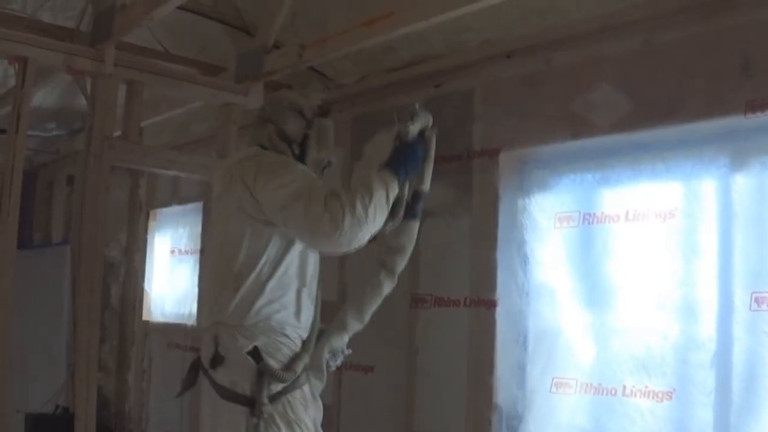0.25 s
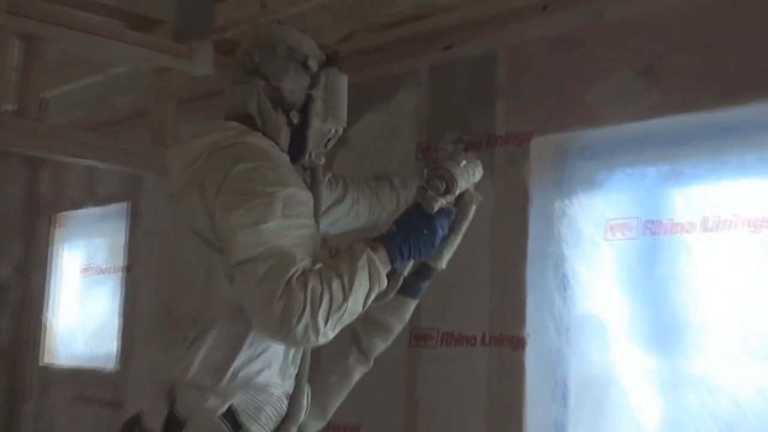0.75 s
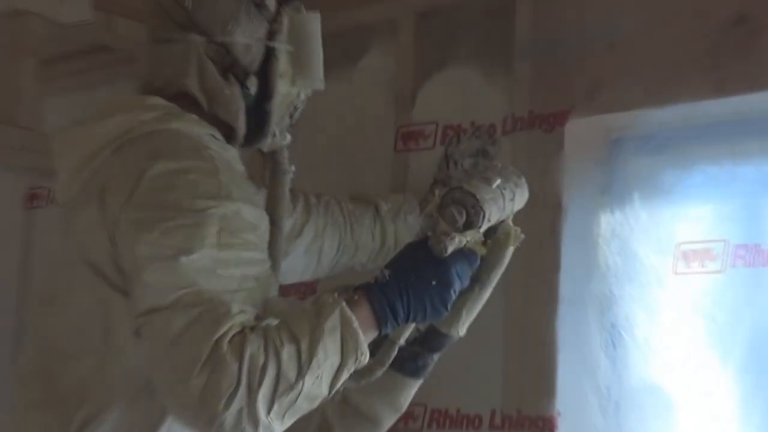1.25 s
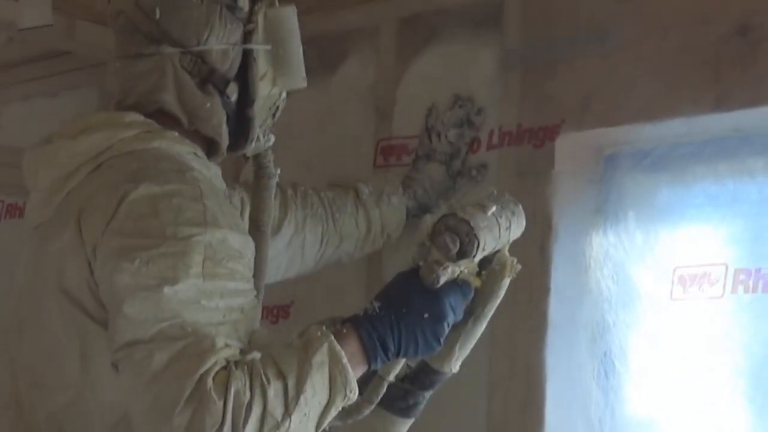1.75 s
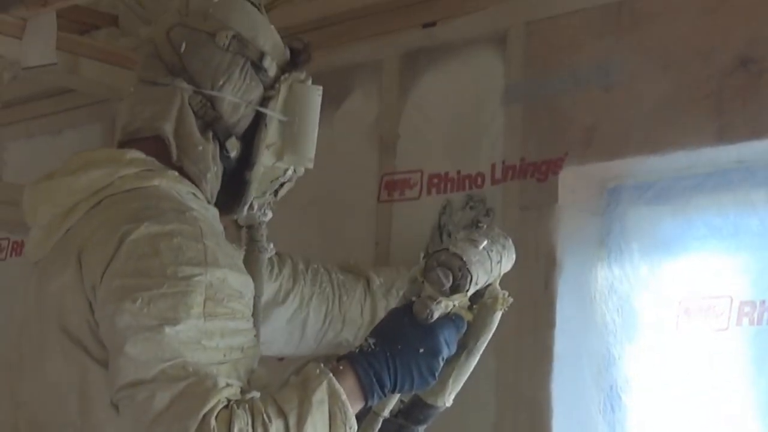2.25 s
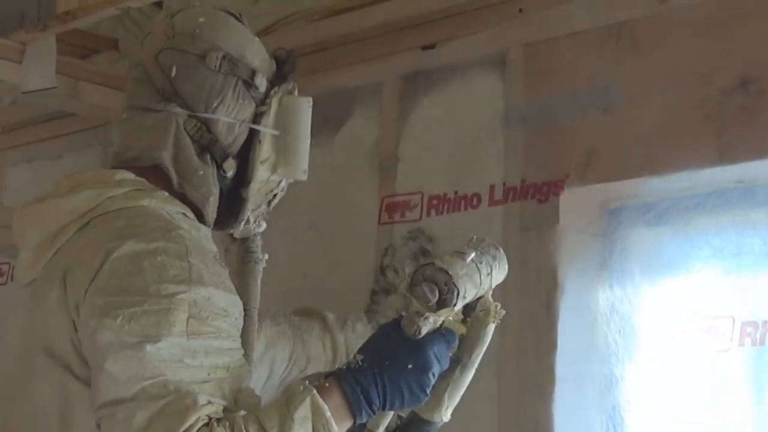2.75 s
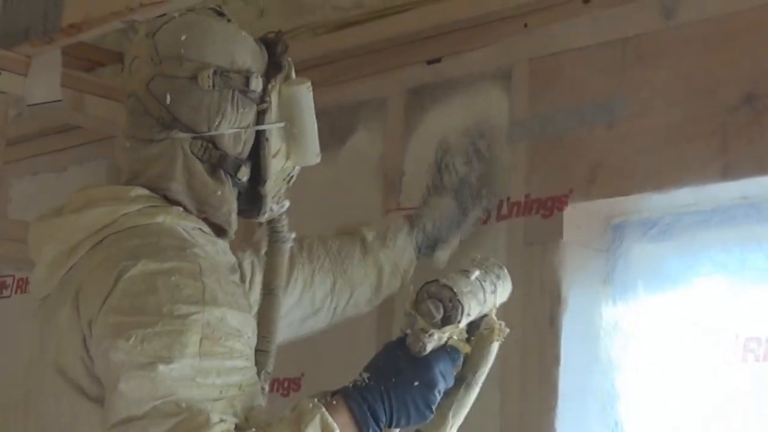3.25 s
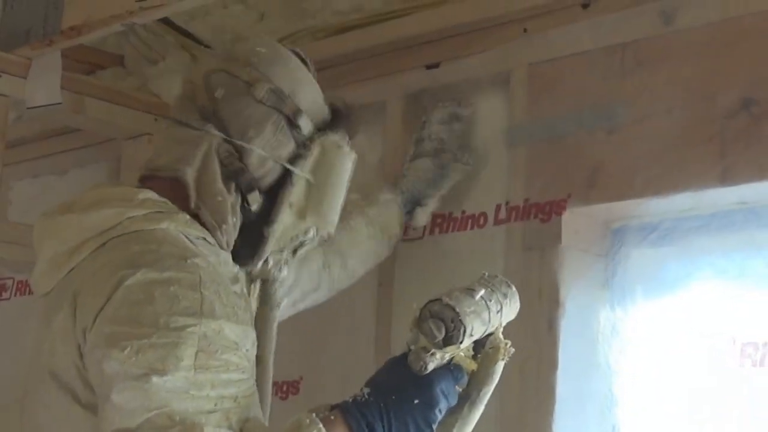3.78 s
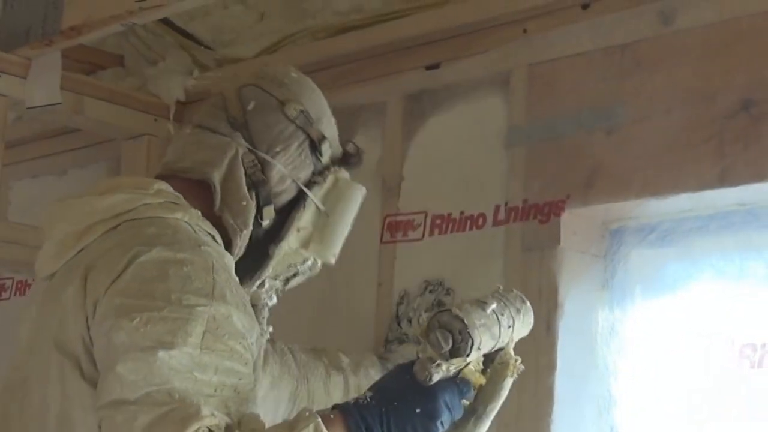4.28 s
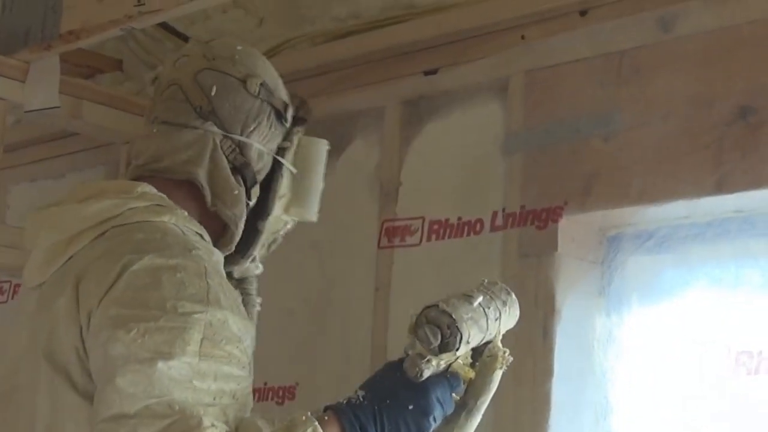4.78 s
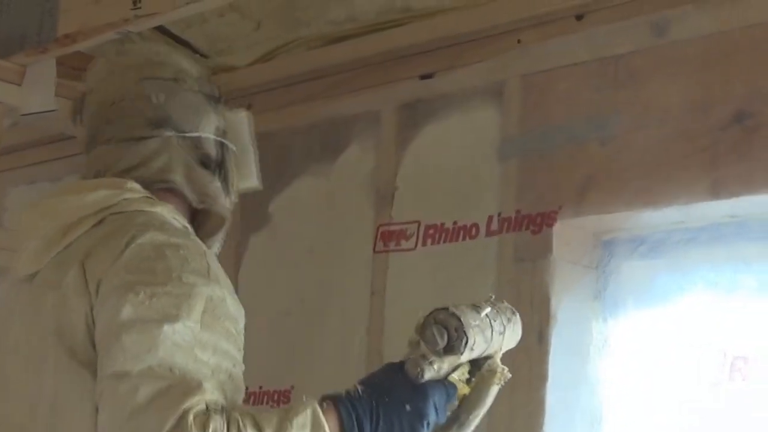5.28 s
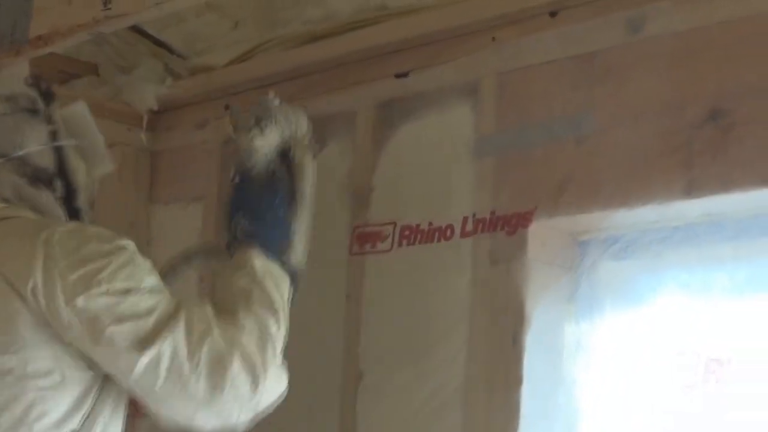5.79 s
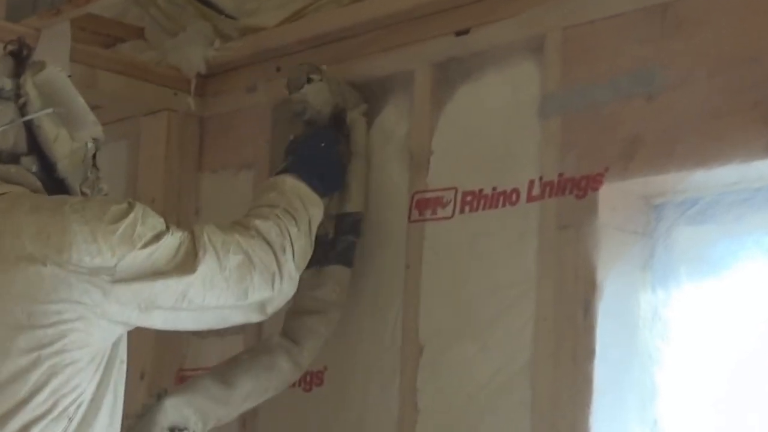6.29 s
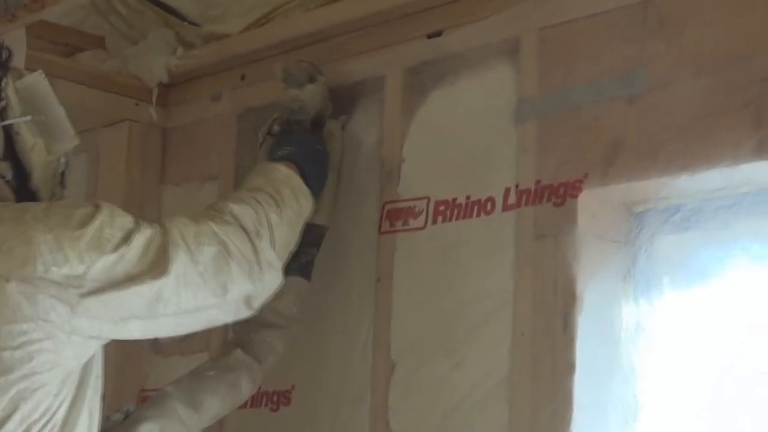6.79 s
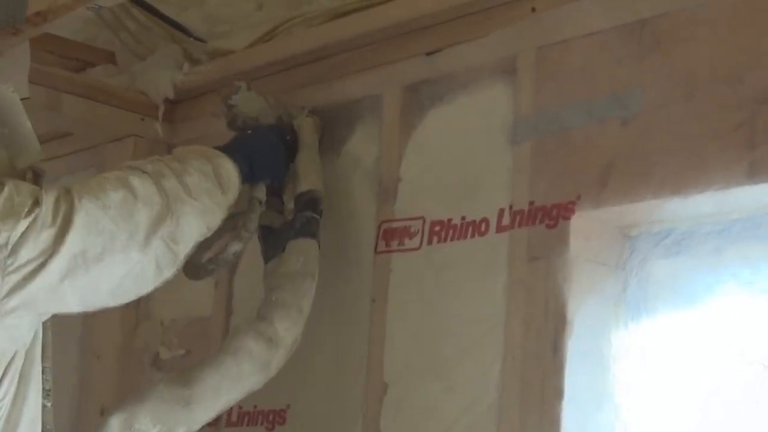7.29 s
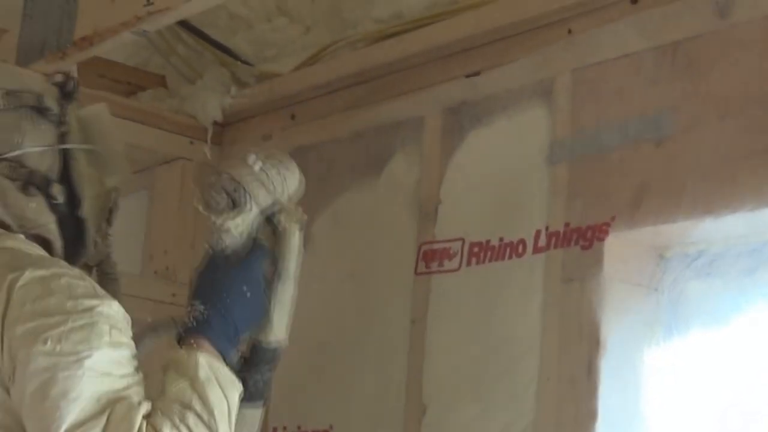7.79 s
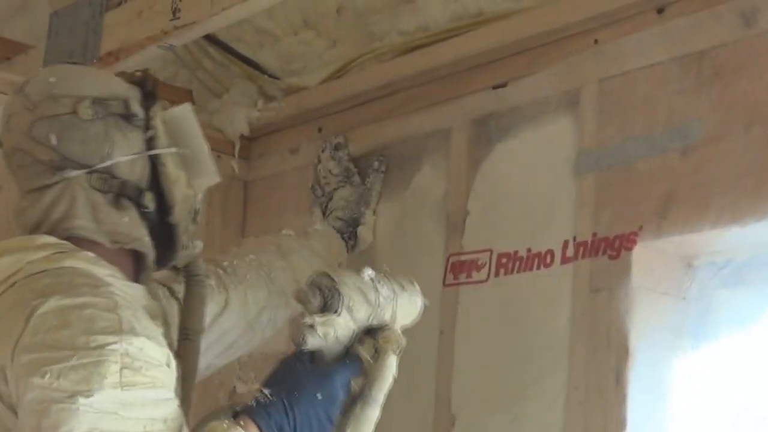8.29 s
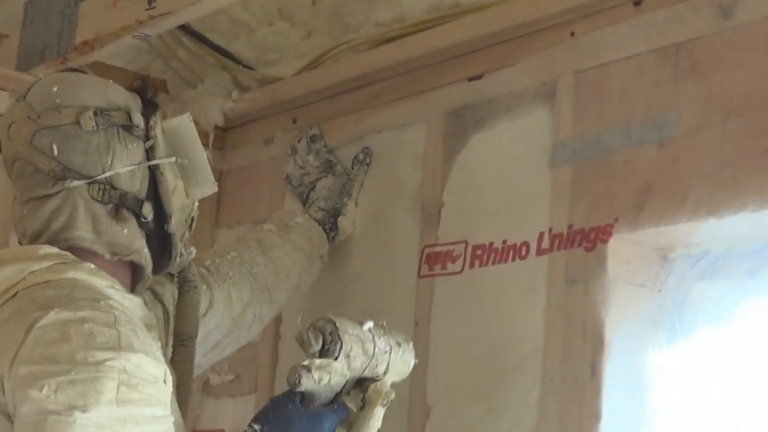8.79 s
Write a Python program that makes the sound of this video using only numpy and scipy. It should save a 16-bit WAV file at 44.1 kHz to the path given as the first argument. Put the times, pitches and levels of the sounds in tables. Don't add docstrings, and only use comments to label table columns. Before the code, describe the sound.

A foam gun bleeds air in a bright, steady hiss in a bare timber room, close to a small stereo microphone. A protective suit and hose rustle and knock dully on studs over a faint compressor hum. Past six seconds a hard blow rings the wood; the hiss drops for half a second, then bursts back with metallic ticks and more knocks.

```python
import sys
import numpy as np
from scipy import signal
from scipy.io import wavfile
from scipy.ndimage import uniform_filter1d

SR = 44100
rng = np.random.default_rng(int(sys.argv[2]) if len(sys.argv) > 2 else 0)


def generate_wav(sig):
    pcm = np.round(np.clip(np.atleast_2d(sig).T, -1, 1) * 32767).astype(np.int16)
    wavfile.write(sys.argv[1], SR, pcm)


def how_loud(loudness_db):
    steps = np.asarray(loudness_db, float) / 20
    return 10 ** steps


N = 398663

AIR_OFF_S, AIR_ON_S = 6.888, 7.375
CUT_FALL_S, CUT_RISE_S = 0.017, 0.008


def evened(x):
    return x / np.sqrt(np.mean(x ** 2) + 1e-20)


def smooth(x, size, axis=-1):
    return uniform_filter1d(uniform_filter1d(x, size, axis=axis), size, axis=axis)


def ramp(t, start, length):
    return np.clip((t - start) / max(length, 1e-3), 0, 1)


def bump(x, centre, width):
    return np.exp(-0.5 * ((x - centre) / width) ** 2)


def read(points, hz):
    f, value = np.transpose(points)
    return np.interp(np.log(hz + 1), np.log(f + 1), value)


def drift(shape, frames, bins):
    patches = smooth(rng.standard_normal(shape), frames, axis=0)
    return evened(uniform_filter1d(patches, size=bins, axis=1))


def grid(size):
    hop = size // 4
    return np.arange(N // hop + 5)[:, None] * hop / SR, np.fft.rfftfreq(size, 1 / SR)


def pair(gain, hz, size, wide_db=0):
    # (f/Hz, correlation)
    likeness = [(40, 1), (150, 0.94), (400, 0.95), (1000, 0.91), (2500, 0.77), (6000, 0.86), (10000, 0.96),
                (15000, 0.93)]
    a, b, c, d = rng.standard_normal((4,) + gain.shape)
    same = np.clip(read(likeness, hz), -1, 1)
    share = np.clip(np.sqrt((1 - same) / 2) * how_loud(wide_db), 0, 1)
    mid = np.sqrt(1 - share ** 2) * (a + 1j * b)
    side = share * (c + 1j * d)
    z = np.array([mid + side, mid - side]) * gain
    return signal.istft(z.transpose(0, 2, 1), nperseg=size, noverlap=size * 3 // 4)[1][:, :N]


def bay(hz):
    # (f/Hz, width/Hz, level/dB)
    cavity = [(904, 38, -4.5), (1238, 35, 5), (1671, 22, 6), (2380, 17, -6.5), (2580, 17, -1),
              (3030, 220, 0.5), (6070, 320, -1.5), (6070, 33, 0.5), (11150, 120, 0.5)]
    return sum(db * bump(hz, f, width) for f, width, db in cavity)


def hum():
    # (f/Hz, level/dB rms)
    orders = [(61, -92), (122.2, -62.5), (183.3, -67.5), (244, -75.5), (305, -81), (408, -71.5)]
    t = np.arange(N) / SR
    waver = evened(smooth(rng.standard_normal((len(orders), N)), 4000))
    out = np.zeros(N)
    for (hz, db), w in zip(orders, waver):
        out += how_loud(db + 3.8 + 1.2 * w) * np.sin(2 * np.pi * (hz * t + 0.06 * w))
    return out


def rustle():
    # (f/Hz, level/dB per Hz)
    colour = [(20, -4), (45, -16), (75, -8), (118, 2), (300, -1.5), (700, 1), (950, 1.5), (1500, -9.5),
              (2500, -6), (5000, -15)]
    # (t/s, level/dB, camera handling rumble re level/dB)
    wash = [
        (0, -59.5, -9),
        (1.2, -59.5, -8.5),
        (4.4, -59.5, -9),
        (4.8, -62, -16),
        (5.5, -61.5, -15),
        (6.4, -60, -14),
        (6.7, -61, -7),
        (8.1, -59.5, -12),
        (9.04, -63.5, -9),
    ]
    # (start t/s, length/s, level over the wash/dB, upper part/dB)
    moves = [(-.1, 0.099, 11, 10), (.1, 0.24, 4.5, 3), (.36, 0.24, 7.5, 5), (1.304, .2, 0, 8),
             (2.15, .45, 2, -2), (4.005, 0.33, 1, 9.5), (4.538, 0.084, 1, 11), (4.87, .14, 4.5, 9),
             (5.753, 0.27, 6.5, 4), (6.05, 0.39, 10, 4), (6.388, 0.1, 18, -5), (6.505, 0.4, 7, 5),
             (6.87, .5, 11.5, 4.5), (7.422, .22, 10, 6), (7.666, 0.14, 6, 6), (8.48, 0.17, 1.5, 11.5)]
    rise_s, fall_s, rumble_share = 0.023, 0.087, 0.49
    t, hz = grid(size=1024)
    wash_s, wash_levels, rumble_levels = np.transpose(wash)
    wash_db = np.interp(t, wash_s, wash_levels)
    rumble_db = np.interp(t, wash_s, rumble_levels)

    shapes = [ramp(t, s, rise_s) - ramp(t, s + length, fall_s) for s, length, _, _ in moves]
    move_db = np.max([move[2] * shape for move, shape in zip(moves, shapes)], axis=0)
    upper_db = 2.5 + np.max([move[3] * shape for move, shape in zip(moves, shapes)], axis=0)
    boom_db = rumble_db - (1 - rumble_share) * move_db + 1.5 * drift((len(t), 1), frames=24, bins=1)

    field_db = read(colour, hz) + bay(hz) + wash_db + move_db
    field_db += (upper_db - 4.5) * np.clip((hz - 700) / 500, 0, 1)
    field_db += (boom_db + 14) * np.clip((170 - hz) / 60, 0, 1)
    field_db += 0.75 * drift((len(t), 1), frames=5, bins=1)
    field_db += 0.39 * drift(field_db.shape, frames=6, bins=8)
    return how_loud(-9) * pair(how_loud(field_db), hz, size=1024)


def knocks():
    # (t/s, peak level/dB, f/Hz, upper part re peak/dB, t60/s)
    blows = [(.005, -43, 480, 14, 0.069), (.352, -40.5, 160, -14, 0.13), (.362, -32, 385, -5, 0.085),
             (0.439, -46, 170, -23, 0.34), (1.9, -43, 243, -16, 0.2), (2.191, -43.5, 200, -13, 0.26),
             (2.798, -41, 240, -8, .2), (3.77, -42, 121, 4, 0.093), (3.895, -44, 107, -22, 0.22),
             (3.945, -38, 95, -20, 0.12), (4.045, -36, 160, -19, 0.13), (4.181, -38, 141, -10, 0.16),
             (4.475, -42, 135, -16, 0.32), (4.53, -39, 153, -10, 0.11), (4.59, -35.5, 153, -3, 0.24),
             (4.91, -46, 397, -7, 0.15), (6.18, -35, 187, 1, 0.13), (6.397, -14, 368, -10, 0.33),
             (7.411, -43, 222, -8, 0.18), (7.517, -25.5, 283, -5, 0.099), (7.522, -30, 568, -2, 0.14),
             (7.543, -24, 255, -6, .09), (7.577, -28, 153, -3, 0.17)]
    # (f/Hz, level/dB, t60/s)
    modes = [(140, -7, .6), (185, -9, .5), (250, -7, .5), (296, -4, .45), (334, 3, .45), (409, -6, .35),
             (463, -3, .35), (520, -6, .3), (600, -8, .25), (690, -13, .2), (1220, -9, .07),
             (1410, -13, .1), (1710, -15, .1)]
    out, t = np.zeros((2, N + SR)), np.arange(SR // 3) / SR
    stud = np.zeros(len(t))
    for k, (hz, db, t60) in enumerate(modes):
        sign = (-1) ** ((k + 1) // 2)
        stud += sign * how_loud(db - 60 * t / t60) * np.sin(2 * np.pi * hz * t)
    stud /= abs(stud).max()

    for s, db, hz, upper_db, t60 in blows:
        noise = rng.standard_normal((3, len(t)))
        ring = stud if db > -23 else 0.6 * np.sin(2 * np.pi * hz * t)
        low = signal.lfilter(*signal.butter(2, [0.65 * hz, 1.6 * hz], "band", fs=SR), noise)
        high = signal.lfilter(*signal.butter(3, [500, 1800], "band", fs=SR), noise)
        scatter = evened(low) + how_loud(upper_db + 4) * evened(high)
        scatter = scatter[0] + 0.39 * scatter[1:]
        scatter = scatter * np.minimum(t / 0.0015, 1)
        start = round(s * SR)
        out[:, start:start + len(t)] += (0.8 * ring + 0.26 * scatter) * how_loud(db - 60 * t / t60)
    return out[:, :N]


def ticks():
    # (t/s, peak level/dB, f/Hz, t60/s)
    rings = [
        (6.812, -34, 3650, .06),
        (7.374, -32, 1850, .08),
        (7.376, -30.5, 5200, .11),
        (7.378, -33, 3000, .05),
        (7.378, -29, 10300, .07),
        (7.497, -41, 1980, .2),
        (7.516, -40, 1970, .15),
    ]
    out, t = np.zeros(N + SR), np.arange(SR // 5) / SR
    for s, db, hz, t60 in rings:
        ring = np.sin(2 * np.pi * hz * t) + 0.6 * np.sin(2 * np.pi * 1.03 * hz * t + 1)
        start = round(s * SR)
        out[start:start + len(t)] += how_loud(db - 60 * t / t60) * ring * np.minimum(t / 0.00057, 1)
    return out[:N]


def spatter():
    size = how_loud(1.7 * np.minimum(rng.exponential(1, N), 4))
    clicks = size * (rng.random(N) < 90 / SR) * rng.choice([-1, 1], N)
    grains = signal.lfilter(*signal.butter(1, [900, 6000], "band", fs=SR), clicks)
    return how_loud(-61.5) * evened(grains)


def whistles():
    # (middle t/s, length/s, f/Hz, level/dB rms)
    edge_tones = [
        (.96, .08, 3030, -50),
        (1.17, .05, 3000, -53),
    ]
    t = np.arange(N) / SR
    pitch_wobble, level_wobble = evened(smooth(rng.standard_normal((2, N)), 500))
    tones = np.zeros(N)
    for s, length, hz, db in edge_tones:
        tones += how_loud(db + 6) * bump(t, s, length) * np.sin(2 * np.pi * (hz * t + 0.13 * pitch_wobble))
    return tones * how_loud(2.9 * level_wobble)


def air_cut(t):
    return ramp(t, AIR_OFF_S, CUT_FALL_S) - ramp(t, AIR_ON_S, CUT_RISE_S)


def valve_db(t):
    leak_db = -5 + 5.5 * (t - AIR_OFF_S)
    burst = ramp(t, AIR_ON_S, CUT_RISE_S) * np.exp(-abs(t - AIR_ON_S) / 0.03)
    return -25.8 + air_cut(t) * leak_db + 1.5 * burst


def jet():
    # (f/Hz, level/dB per Hz)
    colour = [(400, -34.5), (800, -26), (1500, -20.5), (2000, -14.5), (3000, -12), (4200, -9), (5300, -7),
              (6800, -2.5), (7600, 0.5), (8600, 0), (10000, -1), (11500, -3), (13500, -6.5), (15800, -13.5)]
    # (t/s, turn toward the camera 0-1, sharpness/dB, core peak f/Hz, side lobe f/Hz)
    aim = [(0, 0.95, 0, 8650, 5050), (.45, .5, -1, 8750, 4940), (.95, 0.45, 0.8, 8900, 6500),
           (1.35, 0, -0.16, 8560, 5100), (2, 0.2, 0.2, 8550, 5300), (2.45, 0.2, 0.1, 8900, 5940),
           (3.0, 0.2, .3, 8650, 5440), (3.85, .1, .3, 9100, 4900), (4.3, 0.06, -1, 8440, 5140),
           (5.3, 0.33, -1, 8500, 5240), (5.7, 0.4, 0, 8800, 5000), (6.2, 0.7, 1.5, 9300, 5230),
           (6.5, 1, -2, 8750, 5000), (7.6, 1, -.5, 9200, 5200), (8.1, 0.6, -0.7, 8800, 5170),
           (8.38, 0.1, -.3, 8800, 6300), (8.65, 0.34, -0.7, 8700, 5470), (9.04, 0.2, 3, 8900, 5700)]
    # (t/s, f/Hz, length/s, level/dB)
    glints = [(1.0, 3050, .16, 6), (1.31, 9040, .2, 3), (1.77, 4390, .23, -3), (1.77, 5150, .3, 3.5),
              (1.85, 7490, .3, -4), (2.4, 11110, .14, 4), (2.41, 5080, .15, -4), (2.72, 7670, .4, -3),
              (3.57, 8180, .15, 3.5), (3.84, 4800, .23, 4), (4.46, 3530, .18, 4), (4.65, 3010, .7, -4),
              (5.38, 7700, .06, 4), (5.48, 4950, .035, 8), (5.58, 7350, .03, 6), (5.63, 4800, .02, 6),
              (5.7, 7550, .035, 6), (6.22, 2850, .06, 5.5), (6.37, 2240, .26, -4), (6.46, 5430, .23, -3),
              (6.65, 2850, .17, 5.5), (6.65, 3200, .15, 3), (6.65, 12490, .13, 4), (6.79, 10250, .14, 4),
              (8.6, 11370, .13, 5), (8.66, 3360, .17, -4), (8.66, 5600, .12, 2), (8.68, 4050, .15, 3)]
    t, hz = grid(size=512)
    aim_s, *aim_columns = np.transpose(aim)
    turn, sharp_db, core_hz, lobe_hz = (np.interp(t, aim_s, column) for column in aim_columns)
    cut = air_cut(t)
    top_db = -2.5 + 3.6 * turn - 1.3 * cut + 0.79 * sharp_db
    body_db = -3.5 + 0.44 * turn - 2.3 * cut - 0.76 * sharp_db
    base_db = -4.5 + 2.9 * turn - 0.57 * sharp_db

    field_db = read(colour, hz) + bay(hz)
    field_db = field_db + (4.9 - 2.2 * cut) * bump(hz, core_hz, 610 + 220 * turn)
    lobe_db = 1.5 * bump(hz, lobe_hz, 280)
    lobe_db -= 2 * bump(hz, 0.84 * lobe_hz, 510)
    field_db += (1 - turn) * lobe_db
    below_core = np.clip((7200 - hz) / 1400, 0, 1)
    below_body = np.clip((4200 - hz) / 800, 0, 1)
    field_db += top_db * np.clip((hz - 10000) / 2500, 0, 1.3)
    field_db += (7 + body_db) * (below_core - below_body) + (8 + base_db) * below_body
    for s, f, length, db in glints:
        field_db += db * bump(hz, f, 0.024 * f) * bump(t, s, length)
    field_db += 0.85 * drift(field_db.shape, frames=70, bins=4)
    field_db += 0.8 * drift(field_db.shape, frames=7, bins=14)
    field_db += (0.3 + 0.55 * below_body) * drift((len(t), 1), frames=5, bins=1)

    wide_db = (2.5 - 5 * turn) * np.clip((hz - 9500) / 2000, 0, 1)
    hiss = evened(pair(how_loud(field_db), hz, size=512, wide_db=wide_db))
    time = np.arange(N) / SR
    pan_db = -1.9 + 2 * np.interp(time, t[:, 0], turn[:, 0])
    return how_loud(valve_db(time) + pan_db * [[0.5], [-0.5]] - 1.59) * hiss


def room(x, t60=0.14, wet_db=-9.0, turns_per_s=0.606):
    at = np.arange(130, SR // 3, 20)
    turn, out = np.pi * turns_per_s * np.arange(N) / SR, x.copy()
    for k in range(3):
        tail = np.zeros(SR // 3 + 20)
        signs = rng.choice([-1., 1.], len(at))
        tail[at + rng.integers(0, 20, len(at))] = signs * how_loud(-60 * at / SR / t60)
        tail /= np.linalg.norm(tail)
        share = np.sqrt(2 / 3) * np.cos(turn + k * np.pi / 3)
        out += how_loud(wet_db) * signal.oaconvolve(x * share, tail[None], axes=1)[:, :N]
    return out / np.sqrt(1 + how_loud(2 * wet_db))


def scene():
    # (t/s, level/dB)
    duck = [
        (6.355, 0.5),
        (6.37, -2.8),
        (6.392, -1),
        (6.4, -6),
        (6.43, -4.5),
        (6.46, -1.5),
        (6.8, -1.5),
        (6.85, -0.5),
    ]
    duck_db = np.interp(np.arange(N) / SR, *np.transpose(duck))
    steady = room(jet() + spatter()) + hum()
    return how_loud(duck_db) * steady + room(rustle()) + ticks() + knocks() + whistles()


def band_limit(x):
    return signal.sosfilt(signal.butter(12, 15930, fs=SR, output="sos"), x)


def record(dry):
    low_pass = signal.firwin(511, 15790, window=("kaiser", 9), fs=SR)
    limited = signal.oaconvolve(dry, low_pass[None], "same", axes=1)
    return band_limit(limited)


dry = scene()
out = record(dry)
generate_wav(out)
```